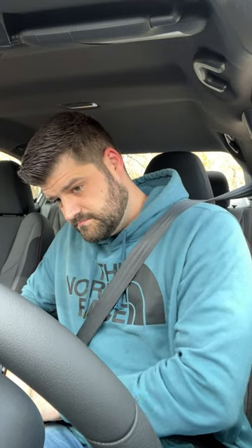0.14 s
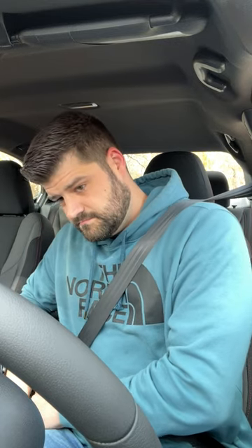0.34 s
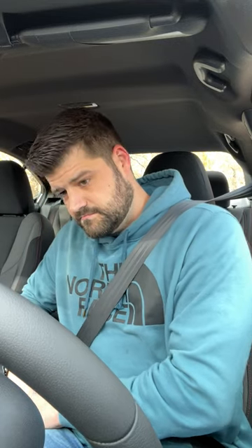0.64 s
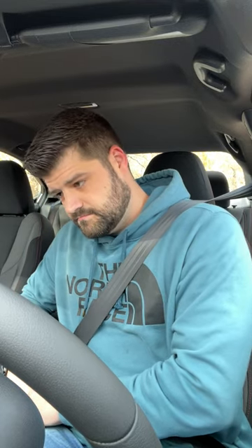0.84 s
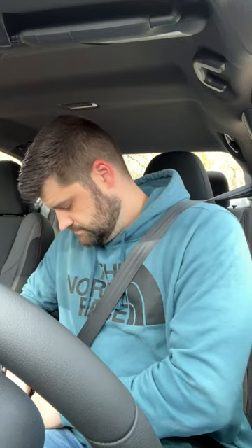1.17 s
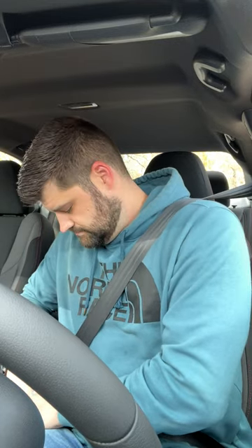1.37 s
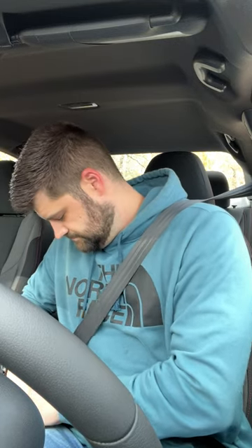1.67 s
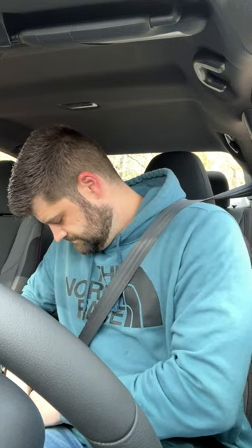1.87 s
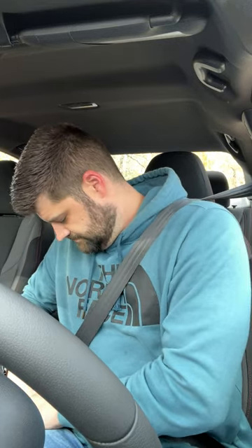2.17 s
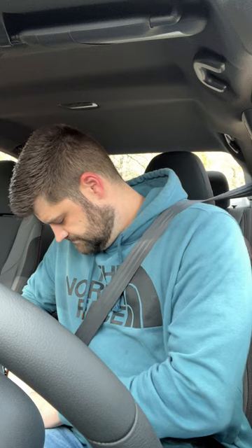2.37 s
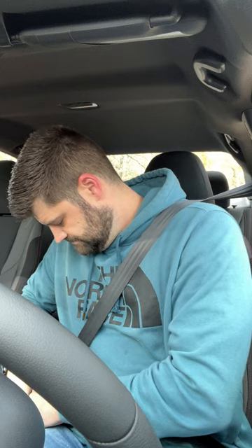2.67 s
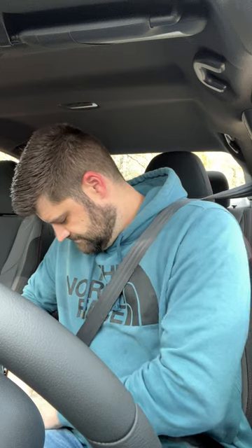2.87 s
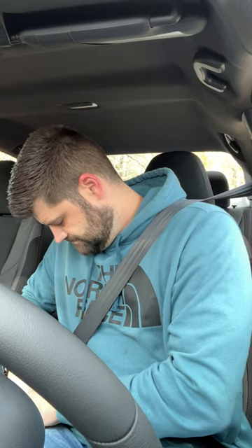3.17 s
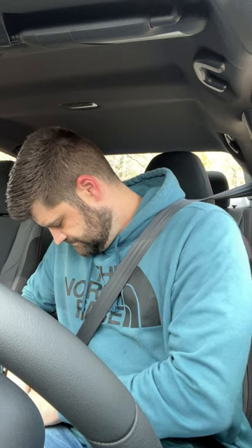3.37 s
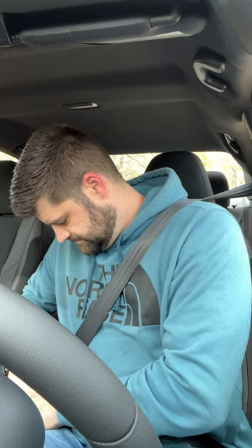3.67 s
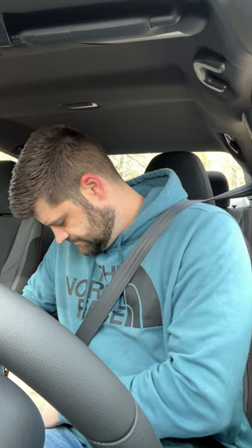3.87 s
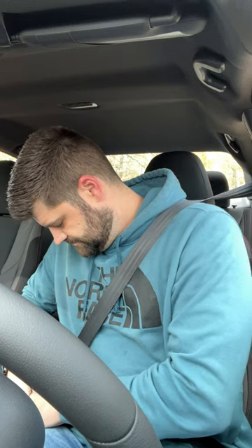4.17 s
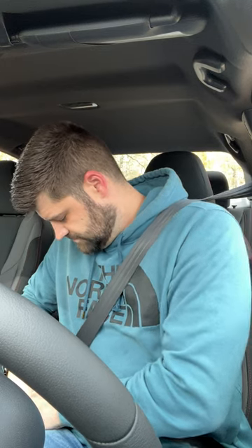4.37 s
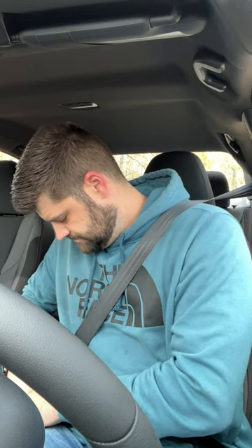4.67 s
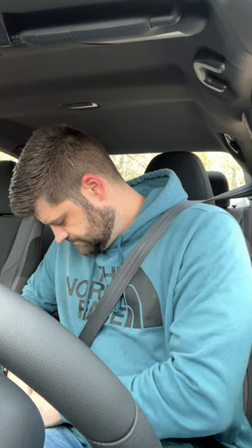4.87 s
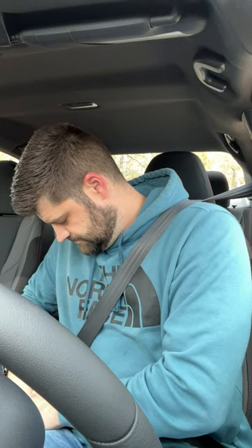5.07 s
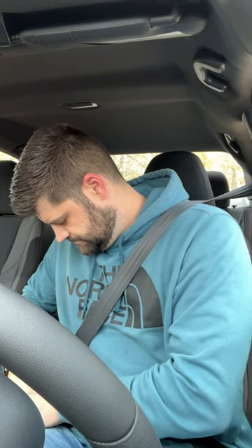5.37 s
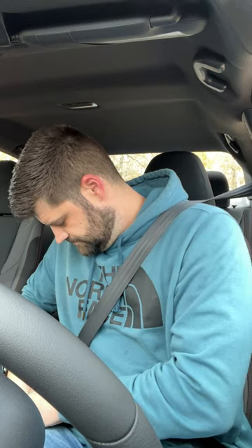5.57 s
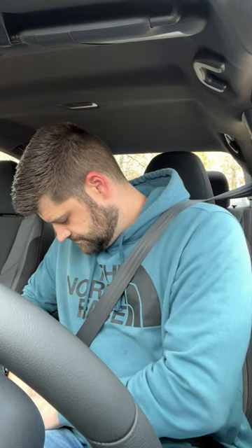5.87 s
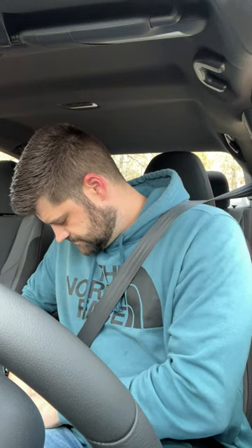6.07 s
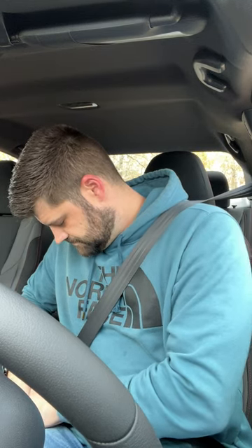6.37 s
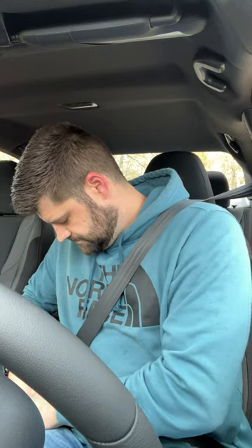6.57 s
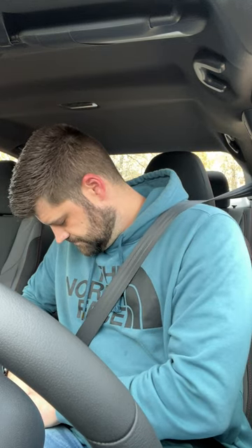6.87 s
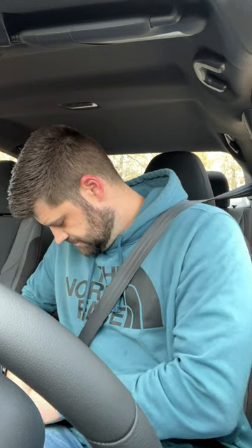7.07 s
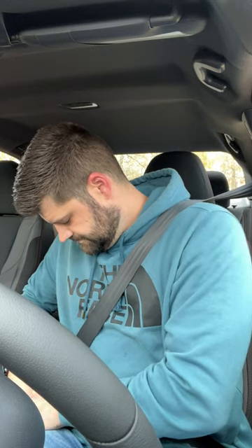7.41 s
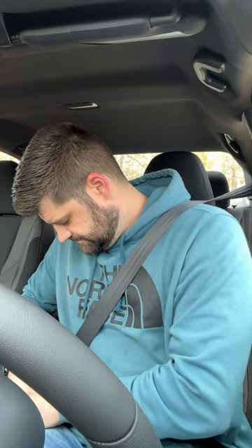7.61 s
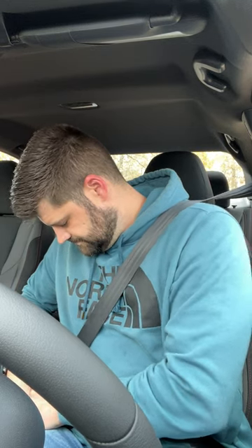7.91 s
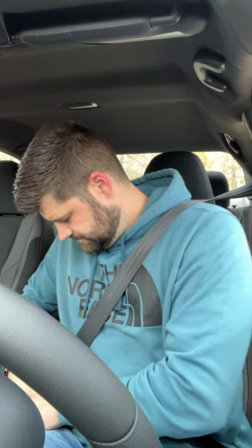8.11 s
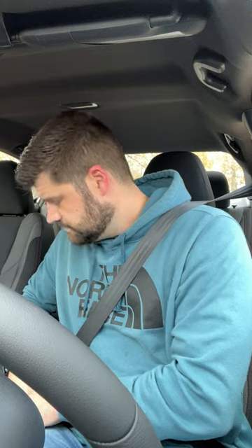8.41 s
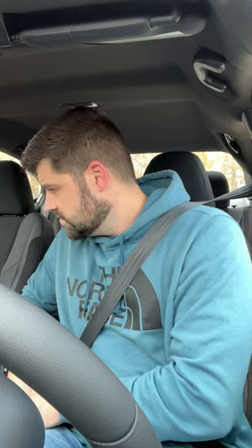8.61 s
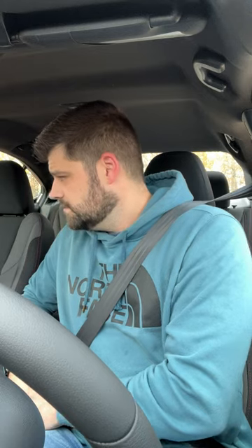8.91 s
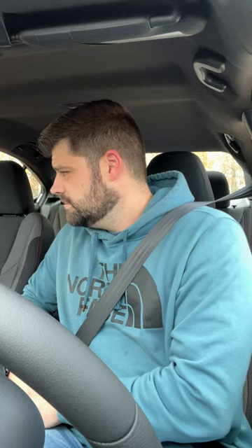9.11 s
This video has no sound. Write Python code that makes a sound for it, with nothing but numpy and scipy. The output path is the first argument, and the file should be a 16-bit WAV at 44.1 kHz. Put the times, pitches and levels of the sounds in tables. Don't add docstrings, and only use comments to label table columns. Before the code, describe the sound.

Repeated hard metallic clacks and duller plastic release clicks from a seat belt buckle, with faint rattles, seat creaks and a low rumble in a small cabin.

```python
import sys
import numpy as np
from scipy import signal
from scipy.fft import rfft, irfft
from scipy.io import wavfile
from scipy.ndimage import uniform_filter1d

SR = 44100
rng = np.random.default_rng(int(sys.argv[2]) if len(sys.argv) > 2 else 0)


def makeup_ratio(level_db):
    decades = np.asarray(level_db, float) / 20
    return 10 ** decades


def dump_mix(stems):
    frames = np.atleast_2d(stems).T
    limited = np.clip(frames, -1, 1)
    pcm = np.round(limited * 32767).astype(np.int16)
    wavfile.write(sys.argv[1], SR, pcm)


N = 407925

# [f/Hz, width/Hz, level/dB]
HOUSING = [(1104, 70, -5), (2124, 166, 4), (2332, 120, -0.5), (3637, 600, -7.5), (4434, 160, -13),
           (4880, 200, -14.5), (5630, 680, -12), (6100, 160, -8.5)]
# [f/Hz, width/Hz, level/dB]
SEAT = [(145.4, 36, -4.5), (230.2, 13.1, 6), (275.7, 36, -1.5), (411.3, 30, -11), (526, 34, -14.5),
        (797, 95, -25)]
# [t/s, peak level/dB, seat thump against it/dB, slide before it/s, slide level/dB]
LATCHES = [(0.398, -10.5, -14, 0.11, -52), (1.258, -11.5, -25, 0.11, -49.5),
           (2.0397, -10.5, -20.5, 0.1, -50), (2.7721, -13, -16, .07, -47.5),
           (3.5139, -12, -20.5, 0.1, -52.5), (4.2672, -11, -30.5, 0.069, -44.5),
           (4.9903, -11.5, -18.5, .096, -52.5), (5.7246, -11, -19, .086, -49),
           (6.455, -11.5, -14, .082, -50), (7.26, -11.5, -17.5, 0.19, -48),
           (7.956, -12, -17.5, 0.088, -48.5), (8.7265, -10.5, -23.5, .091, -52.5)]
# [t/s, peak level/dB, seat thump against it/dB, slide before it/s, slide level/dB]
RELEASES = [(0.7949, -13, -24.5, 0.05, -54), (1.6218, -15.5, -16.5, 0.059, -55.5),
            (2.365, -13, -22.5, .093, -59), (3.1239, -13.5, -14.5, 0.066, -58),
            (3.867, -13, -15, .067, -53), (4.6124, -15, -16.5, 0.054, -55),
            (5.3632, -15, -10.5, 0.075, -63.5), (6.1204, -14.5, -17, .075, -55),
            (6.8553, -14, -13, 0.04, -51.5), (7.5954, -15, -15, .031, -61), (8.3409, -14, -15, 0.08, -59),
            (9.081, -13, -22, 0.079, -58)]


def read(points, hz):
    f, value = np.transpose(points)
    return np.interp(np.log(hz + 1), np.log(f + 1), value)


def evened(x):
    return x / np.sqrt(np.mean(x ** 2) + 1e-20)


def control(rows):
    return makeup_ratio(np.interp(np.arange(N) / SR, *np.transpose(rows)))


def coloured(x, points):
    log_gain = np.log(makeup_ratio(read(points, abs(np.fft.fftfreq(4096, 1 / SR)))))
    minimum_phase = np.exp(np.conj(signal.hilbert(log_gain)))
    taps = np.fft.ifft(minimum_phase).real[:2048]
    return signal.oaconvolve(x, taps)[:N]


def ring(x, modes):
    t = np.arange(4096) / SR
    shape = np.zeros(len(t))
    for k, (hz, width, db) in enumerate(modes):
        decay = np.exp(-np.pi * width * t)
        shape += (-1) ** k * makeup_ratio(db) * width * decay * np.sin(2 * np.pi * hz * t)
    return signal.oaconvolve(x, shape / np.linalg.norm(shape))[:N]


def air():
    # [f/Hz, level/dB]
    air_spectrum = [(15, -66), (32, -9), (64, 10.5), (130, 1.5), (240, -7), (400, -15.5), (1100, -19),
                    (2200, -29.5), (5000, -35), (9000, -39.5), (16000, -64)]
    # [t/s, level/dB]
    air_level = [
        (0, -55.5),
        (.2, -72.5),
        (.35, -59.5),
        (.5, -68),
        (1, -65),
        (1.8, -64),
        (9.25, -62.5),
    ]
    hiss = np.array([coloured(noise, air_spectrum) for noise in rng.standard_normal((2, N))])
    return makeup_ratio(20) * control(air_level) * evened(hiss)


def slides():
    # [start t/s, length/s, level/dB]
    gropes = [
        (0.239, 0.059, -62.5),
        (1.882, 0.067, -53.5),
        (3.364, 0.07, -74),
        (5.574, 0.065, -60),
        (7.111, 0.095, -48),
    ]
    longest_s, overrun_s = 0.1, 0.058
    tongue_fade_db, button_fade_db, grope_fade_db = -1, 5, -5
    rows = []
    for snaps, fade_db in [(LATCHES, tongue_fade_db), (RELEASES, button_fade_db)]:
        for s, _, _, lead, db in snaps:
            lead = min(lead, longest_s)
            rows.append((s - lead, lead + overrun_s, db, fade_db))
    return rows + [(*row, grope_fade_db) for row in gropes]


def hands():
    # [f/Hz, level/dB]
    scrape_spectrum = [(250, -30), (600, -3), (1100, -3), (2150, 1), (3000, -4), (4300, -2), (6400, 1),
                       (8500, -5), (16000, -14)]
    # [t/s, creak level/dB]
    creak_level = [(0.0, -57.5), (0.49, -59.5), (1.72, -67.5), (2.0, -52.5), (3.04, -51), (3.37, -43),
                   (3.6, -58.5), (4.0, -49), (4.4, -55), (5.0, -45), (5.25, -54), (5.62, -41.5),
                   (5.8, -57.5), (6.31, -48), (6.9, -53), (7.21, -48.5), (8.1, -53), (9.25, -51)]
    t, stroke = np.arange(N) / SR, np.zeros(N)
    for s, length, db, fade_db in slides():
        u = (t - s) / length
        edges = np.clip(np.minimum(u / 0.087, (1 - u) / 0.056), 0, 1)
        stroke += makeup_ratio(db + fade_db * np.clip(u, 0, 1)) * edges
    grains, lumps = rng.standard_normal((2, N))
    flicker_db = 4.3 * evened(uniform_filter1d(rng.standard_normal(N), size=260))
    grains = evened(grains * makeup_ratio(1.3 * flicker_db + 4.6 * rng.exponential(1, N)))
    scrape = evened(coloured(grains, scrape_spectrum)) + 0.057 * ring(grains, HOUSING)
    creak = ring(lumps * makeup_ratio(1.21 * flicker_db[::-1]), SEAT)
    creak = (control(creak_level) + makeup_ratio(7.5) * stroke) * evened(creak)
    return np.array([stroke * scrape, creak])


def light_contacts():
    # [t/s, level/dB, housing ring against it/dB]
    fidgets = [(0.011, -34.5, -9), (0.5459, -49, -5), (0.649, -43.5, -11), (0.701, -44.5, -8.5),
               (0.8949, -42, 9), (1.5688, -41, 3), (1.609, -31.5, -9), (2.2874, -36, 1.5),
               (3.0699, -43.5, -10), (3.111, -37, -11.5), (4.599, -47, -3.5), (4.553, -46.5, -11.5),
               (4.509, -48.5, -11), (3.7686, -45.5, 0), (3.815, -52.5, -8), (4.134, -53.5, -10.5),
               (4.5697, -40.5, -25.5), (5.2414, -41, -9.5), (5.333, -45, 15), (6.0376, -41.5, -17.5),
               (6.104, -40, -12), (6.799, -41, -0.5), (6.8295, -34.5, 13), (7.4894, -45, -10),
               (7.5638, -47, 20.5), (8.2828, -46.5, -10), (8.322, -36, -9), (8.8247, -51.5, -17),
               (8.994, -46, -13)]
    # [t/s, level/dB]
    let_gos = [(0.075, -26.5), (0.9324, -28.5), (1.731, -34), (2.4893, -28.5), (3.225, -29),
               (3.9671, -30.5), (4.7151, -30.5), (5.466, -30), (6.2159, -29), (6.943, -32), (7.7108, -31),
               (8.456, -30.5), (9.199, -30)]
    # [t/s, level/dB]
    stops = [(0.105, -32.5), (0.9659, -30.5), (1.7611, -32.5), (2.5245, -29), (3.259, -30), (4.0015, -29.5),
             (4.7463, -27.5), (5.4941, -29.5), (6.2519, -29), (6.9752, -31.5), (7.7372, -30), (8.4904, -29),
             (9.2318, -29)]
    # [t/s, level/dB, seat thump against it/dB]
    knocks = [(0.242, -36, 7), (0.2801, -42.5, 7.5), (1.0966, -27.5, 2), (1.8832, -31.5, 5),
              (2.707, -40, 4), (3.358, -37, 4.5), (3.3956, -44.5, 9.5), (3.4298, -38, 5),
              (4.1714, -46, 11.5), (4.1922, -39, 3.5), (4.84, -37.5, 2), (4.9001, -42, 1.5),
              (5.5855, -42, 13.5), (5.6077, -40, 4), (6.3719, -60, 14), (7.1166, -36, 3), (7.1394, -49, 24),
              (7.1867, -41, -0.5), (7.8443, -45.5, 10), (7.877, -47.5, -9.5), (8.601, -44.5, 8),
              (8.6481, -41.5, -2.5)]
    # [t/s, level/dB]
    catches = [(0.3052, -43), (0.3455, -41.5), (1.1809, -38.5), (1.9514, -37), (2.7251, -37.5),
               (3.447, -37.5), (4.2087, -38), (4.9175, -39), (5.6466, -36.5), (6.393, -50.5), (7.195, -37),
               (7.888, -41), (8.663, -34)]
    # [t/s, level/dB]
    thumbs = [(0.5777, -27), (1.4403, -26.5), (2.221, -25), (2.9589, -27), (3.697, -27), (4.4551, -26.5),
              (5.1674, -25.5), (5.9082, -26), (6.6258, -27), (7.45, -27.5), (8.1301, -27.5),
              (8.9113, -26.5)]
    # [t/s, level/dB]
    settles = [(0.8385, -42.5), (1.6653, -39), (2.4149, -36.5), (3.171, -36.5), (3.911, -41), (4.6568, -37),
               (5.4057, -36), (6.168, -39), (6.902, -38.5), (7.643, -37), (8.3874, -39.5), (9.1292, -41.5)]
    rows = [(s, db, ring_db, -6, 0.005) for s, db, ring_db in fidgets]
    rows += [(s, db, -9, -7.5, 0.007) for s, db in let_gos]
    rows += [(s, db, -11.5, -5, 0.0014) for s, db in stops]
    rows += [(s, db, -8, seat_db, 0.0031) for s, db, seat_db in knocks]
    rows += [(s, db, -16.5, -2, 0.011) for s, db in catches]
    rows += [(s - 0.011, db - 10, -14.5, -2.5, 0.005) for s, db in thumbs]
    rows += [(s, db, -18.5, -5.5, 0.0043) for s, db in thumbs]
    rows += [(s, db, -12, -3, 0.0021) for s, db in settles]
    return rows


def hard_contacts():
    rows = [(s, db, -24, seat_db, 0.0035) for s, db, seat_db, _, _ in LATCHES]
    return rows + [(s, db, -11, seat_db, 0.0013) for s, db, seat_db, _, _ in RELEASES]


def buckle(rows, rebounds, rise_s, soft, ring_db, crack_db):
    # [f/Hz, width/Hz, level/dB]
    steel_modes = [(1140, 80, 8), (2296, 110, -3.5), (2407, 33, -3), (4050, 790, 5), (5380, 380, -31.5),
                   (5570, 1100, 5), (6760, 300, 4.5), (7750, 190, -6.5), (7770, 93, -4.5), (7700, 62, 8),
                   (9350, 1500, 1), (1070, 28, 3.5)]
    # [f/Hz, level/dB]
    crack_spectrum = [(300, 5), (700, -3.5), (1200, -11), (2500, 1), (4000, 1.5), (6500, 3.5), (9000, -1),
                      (12000, -2.5), (16000, -21)]
    # [f/Hz, level/dB]
    stalk_spectrum = [(150, -20), (350, 3), (700, -6.5), (1200, 3.5), (2500, -31), (16000, -69)]
    steel, housing, shell, stalk, seat = np.zeros((5, N + 2000))
    t = np.arange(1500) / SR
    draws = rng.standard_normal((len(rows), 2, len(t)))
    for (s, db, housing_db, seat_db, length), (size, chance) in zip(rows, draws):
        length = max(length, 0.0005)
        share = np.clip((housing_db + 25.5) / 16, 0, 1)
        bounce = np.zeros(len(t))
        for r, r_db in [(0, 0.011)] + rebounds:
            bounce += makeup_ratio(r_db) * np.clip((t - r) / 0.0028, 0, 1) * np.exp(-abs(t - r) / length)
        onset = np.minimum(t / (0.00034 + rise_s * share + soft * length), 1)
        rattle = size * (chance > 0.8) * bounce * onset
        rattle *= makeup_ratio(db) / np.linalg.norm(rattle)
        firmest = (abs(rattle) == abs(rattle).max()) * np.sign(rattle)
        start = round((s + 0.0012) * SR)
        at = slice(start, start + len(t))
        steel[at] += np.sqrt(1 - share) * rattle
        housing[at] += np.sqrt(share) * rattle
        shell[at] += np.sqrt(share) * (0.22 * rattle + makeup_ratio(db - 2.5) * firmest)
        stalk[at] += makeup_ratio(seat_db) * rattle
        push = size * t / 0.006 * np.exp(-t / 0.01)
        seat[at] += makeup_ratio(db + seat_db) * push / np.linalg.norm(push)
    ringing = ring(steel, steel_modes) + makeup_ratio(-1.0) * ring(shell, HOUSING)
    crack = coloured(steel + 0.6 * housing, crack_spectrum)
    bright = makeup_ratio(ring_db) * ringing + makeup_ratio(crack_db) * crack
    bright += makeup_ratio(22.5) * coloured(stalk, stalk_spectrum)
    return np.array([bright, makeup_ratio(28.0) * ring(seat, SEAT)])


def cabin(x, direct):
    # [f/Hz, time/s]
    echo_time = [(150, 0.072), (400, 0.043), (1040, 0.044), (2760, 0.054), (7280, 0.035), (16000, 0.017)]
    taps = np.zeros(8192)
    at = np.arange(40, 8100, 12)
    taps[at + rng.integers(0, 12, len(at))] = rng.choice([-1., 1.], len(at))
    hz, t, z = signal.stft(taps, SR, nperseg=128)
    fall_s = np.maximum(read(echo_time, hz), 0.01)[:, None]
    tail = signal.istft(z * makeup_ratio(-60 * t / fall_s), SR, nperseg=128)[1]
    tail /= np.linalg.norm(tail)
    tail[0] += direct
    spectrum = rfft(np.roll(tail, 256))
    tail = irfft(spectrum / np.sqrt(uniform_filter1d(abs(spectrum) ** 2, size=40)))
    return signal.oaconvolve(x, tail[256:5000])[:N]


def scene():
    # [f/Hz, level/dB]
    middle_spectrum = [(1000, -0.5), (1250, -2), (1550, -3), (1900, 3.5), (8500, -2), (10300, -10),
                       (11300, -12.5), (12400, -30.5), (15800, -28), (16600, -44.5)]
    # [f/Hz, level/dB]
    width_spectrum = [(60, -42.5), (130, -29.5), (290, -19.5), (640, -6), (1410, -1.5), (3100, 1),
                      (6820, -9.5), (11000, -4), (15500, -7.5), (16500, -66)]
    hiss = air()
    ticks = buckle(light_contacts(), rebounds=[(0.007, -18)],
                   rise_s=0.00059, soft=0.74, ring_db=13.5, crack_db=20.5)
    snaps = buckle(hard_contacts(), rebounds=[(0.0048, 0), (0.024, -23.5)],
                   rise_s=0.0058, soft=0.05, ring_db=16.5, crack_db=19.5)
    near, low = snaps + ticks + hands()
    mid = coloured(cabin(near, direct=1.0) + low + hiss[0], middle_spectrum)
    side = coloured(cabin(near + low, direct=0) + makeup_ratio(-1.5) * hiss[1], width_spectrum)
    return np.array([mid + side, mid - side])


def roll_off(x):
    return signal.sosfilt(signal.butter(12, 16470, fs=SR, output="sos"), x)


def record(dry):
    hz, t, z = signal.stft(dry, SR, nperseg=256)
    power = (abs(z) ** 2).mean(0)
    power = uniform_filter1d(power, size=5, axis=1)
    power = uniform_filter1d(power, size=9, axis=0)
    usual = np.percentile(power, 20, axis=1, keepdims=True)
    above_bass = hz[:, None] > 600
    kept = np.maximum(power / (power + 0.74 * usual * above_bass), 0.45)
    clean = signal.istft(z * kept, SR, nperseg=256)[1][:, :N]
    return roll_off(clean)


dry = scene()
out = record(dry)
dump_mix(out)
```